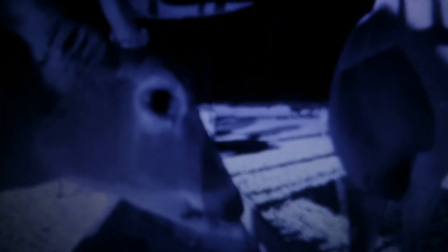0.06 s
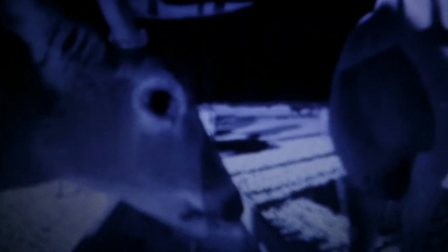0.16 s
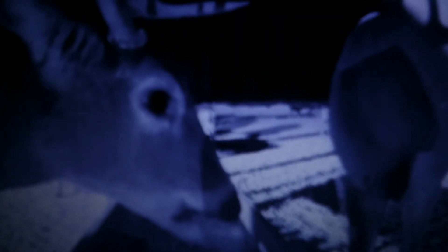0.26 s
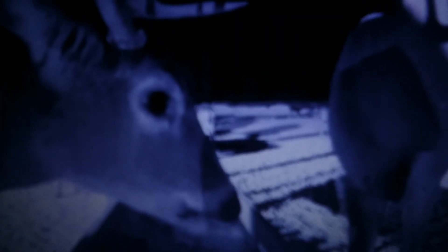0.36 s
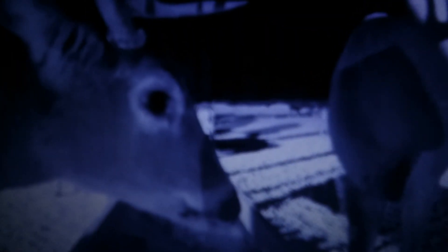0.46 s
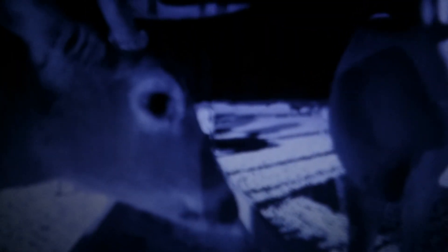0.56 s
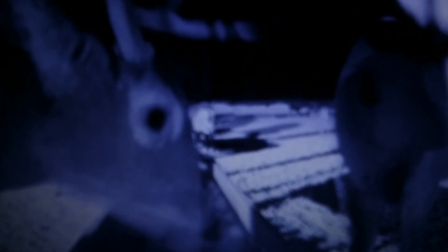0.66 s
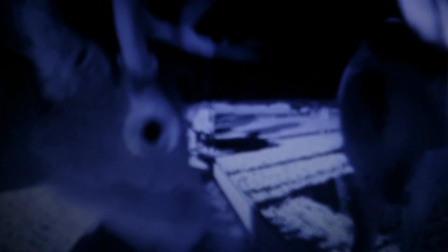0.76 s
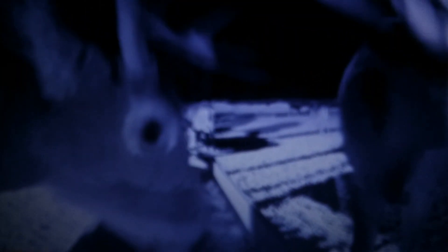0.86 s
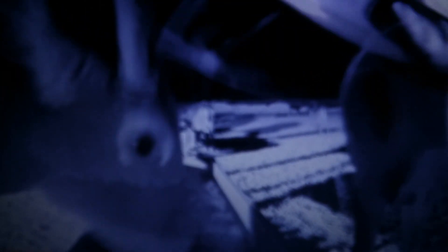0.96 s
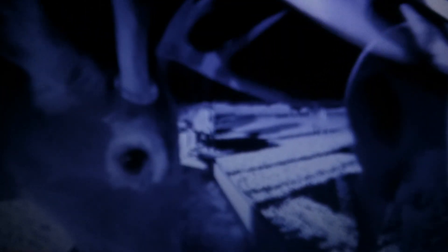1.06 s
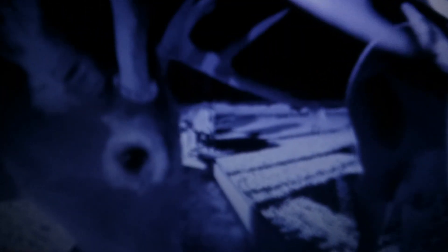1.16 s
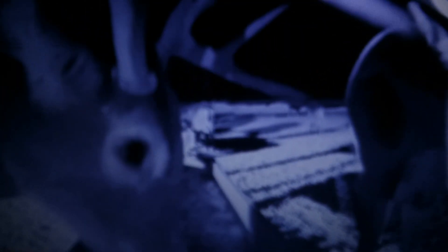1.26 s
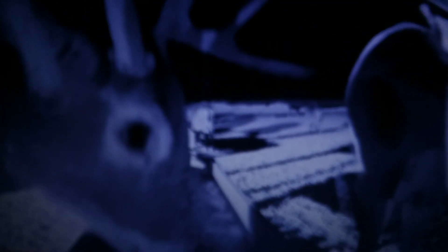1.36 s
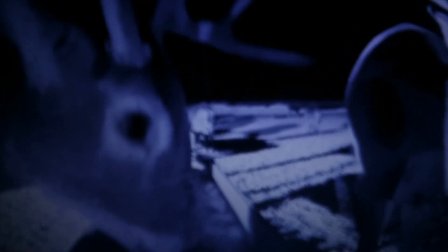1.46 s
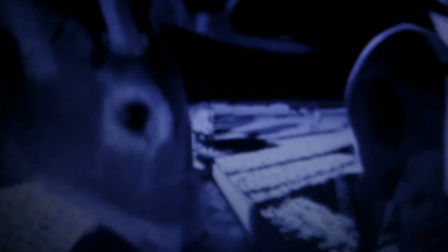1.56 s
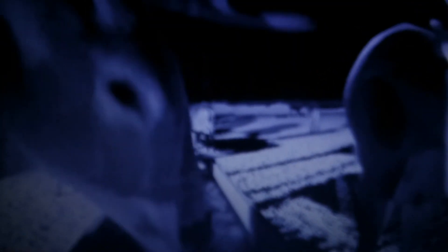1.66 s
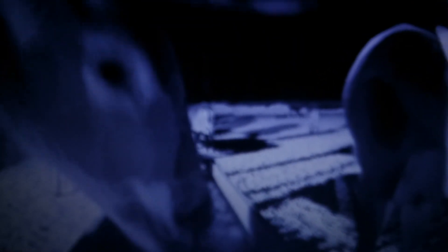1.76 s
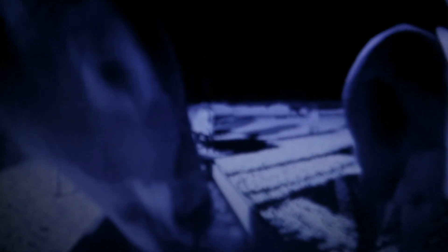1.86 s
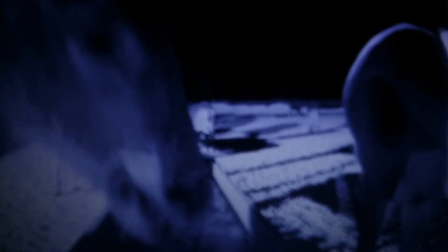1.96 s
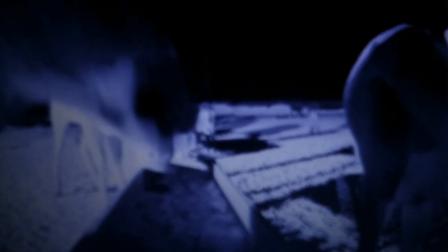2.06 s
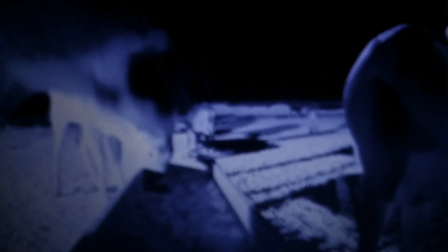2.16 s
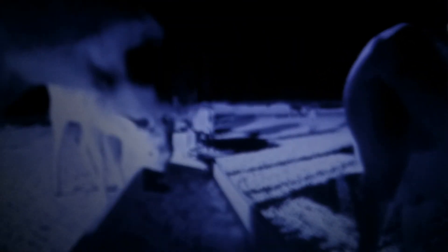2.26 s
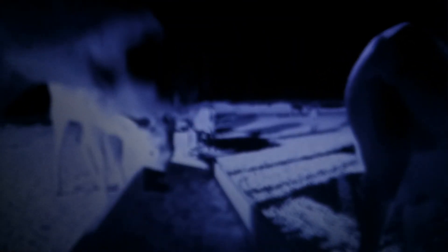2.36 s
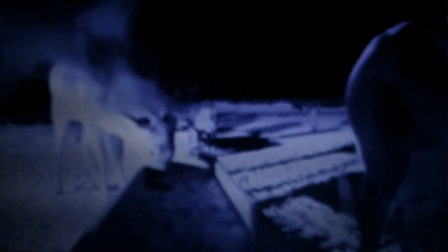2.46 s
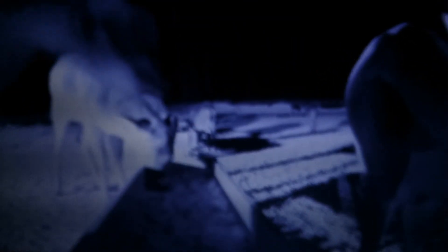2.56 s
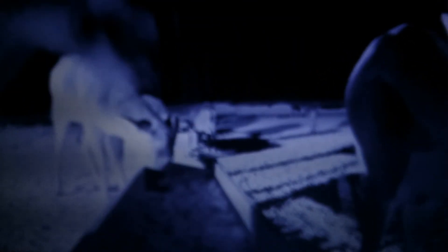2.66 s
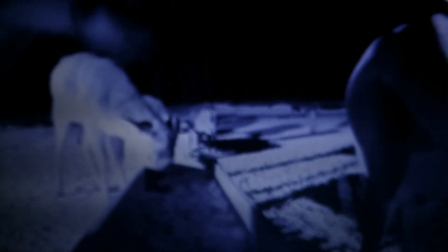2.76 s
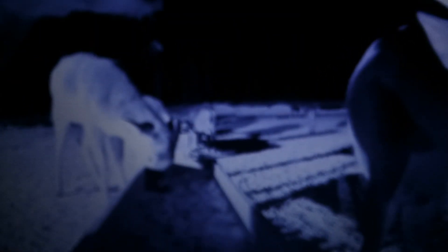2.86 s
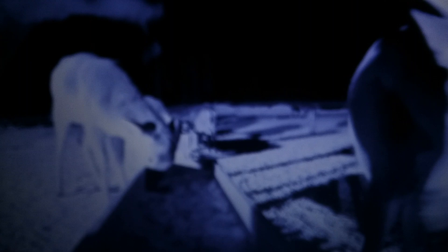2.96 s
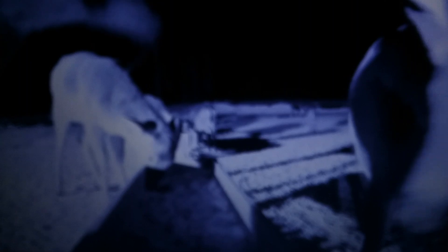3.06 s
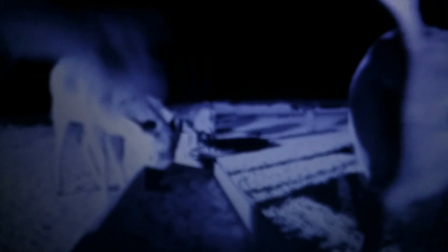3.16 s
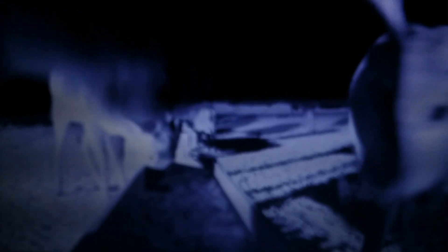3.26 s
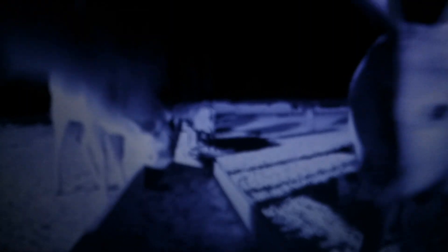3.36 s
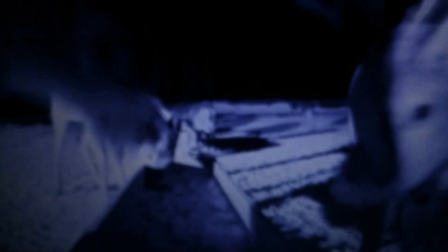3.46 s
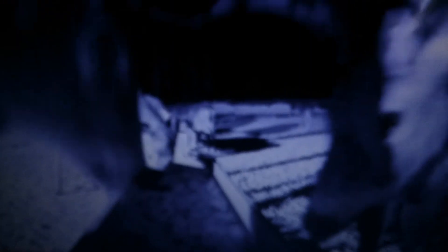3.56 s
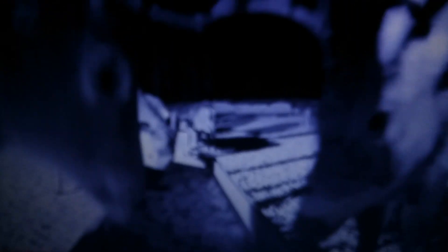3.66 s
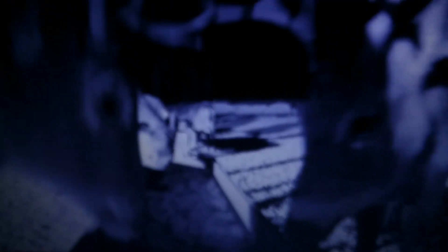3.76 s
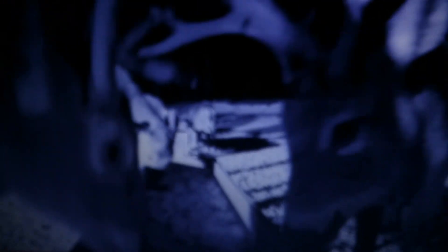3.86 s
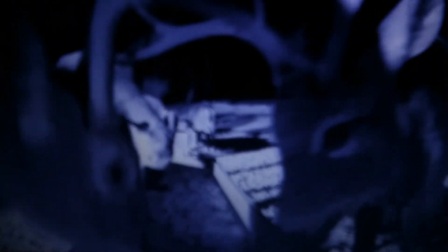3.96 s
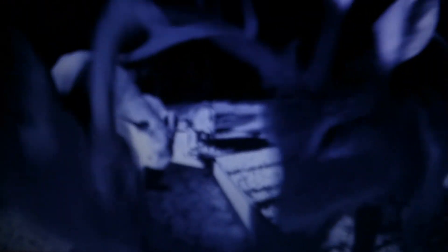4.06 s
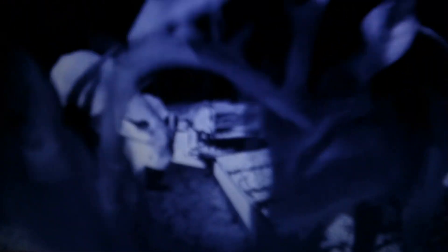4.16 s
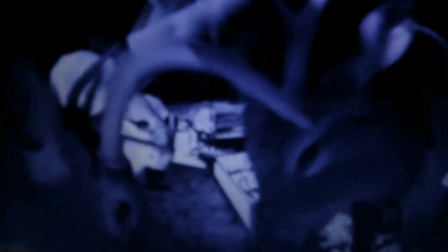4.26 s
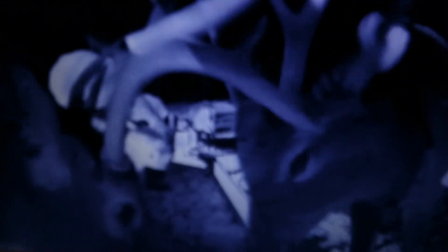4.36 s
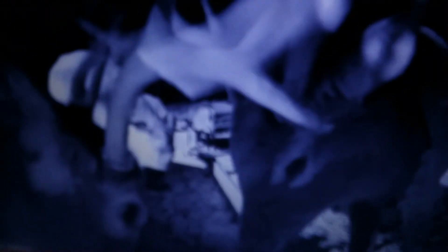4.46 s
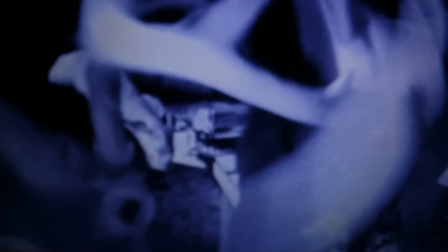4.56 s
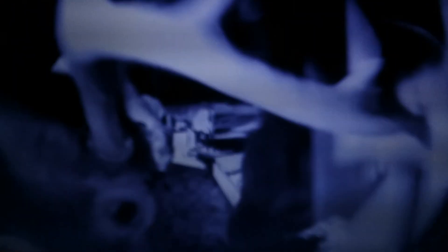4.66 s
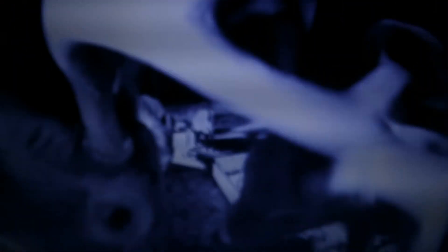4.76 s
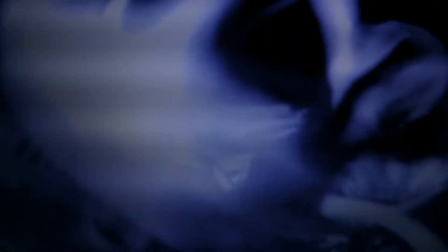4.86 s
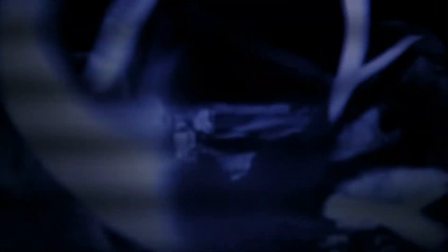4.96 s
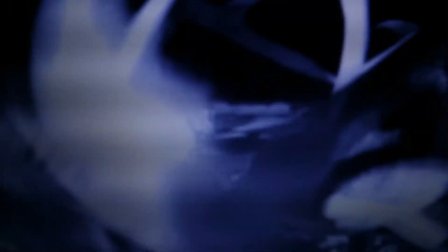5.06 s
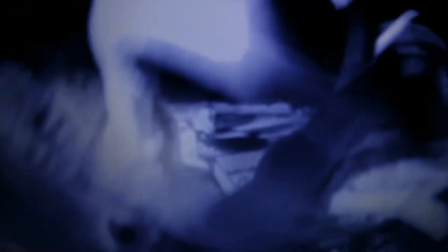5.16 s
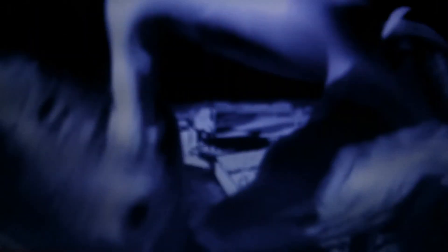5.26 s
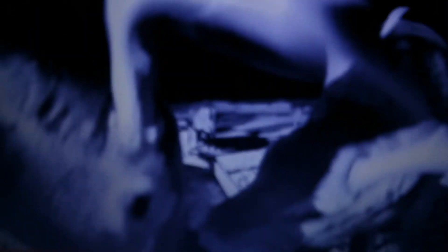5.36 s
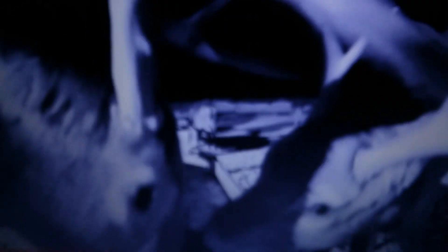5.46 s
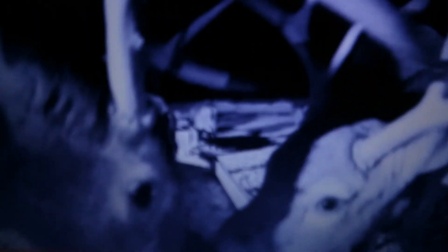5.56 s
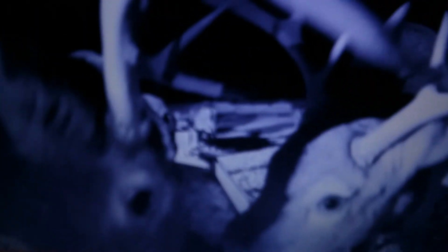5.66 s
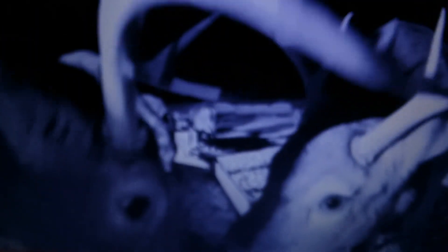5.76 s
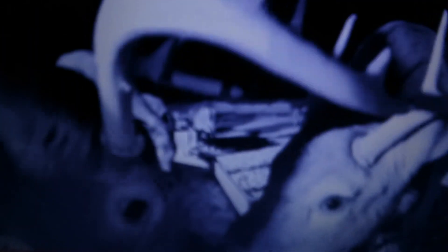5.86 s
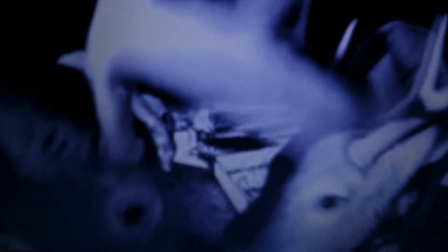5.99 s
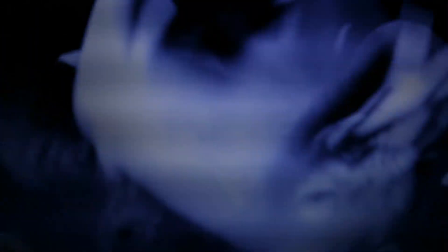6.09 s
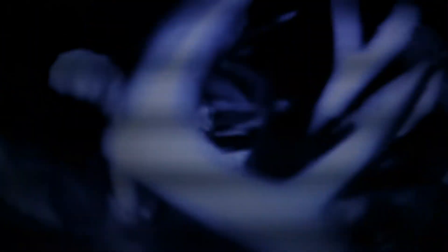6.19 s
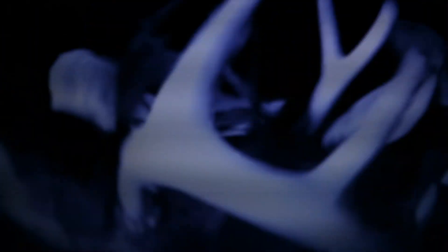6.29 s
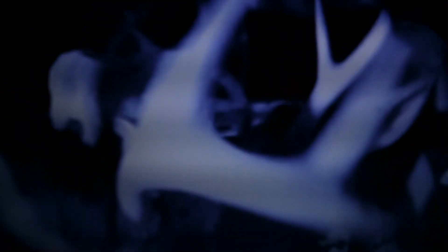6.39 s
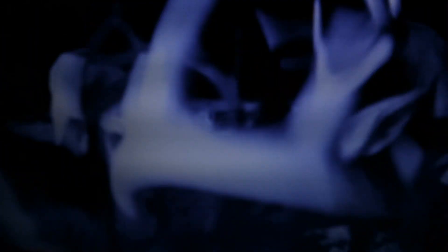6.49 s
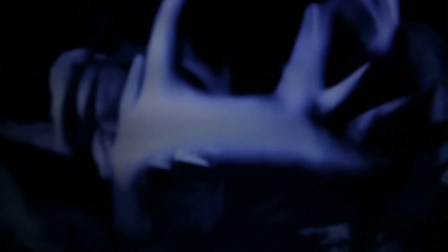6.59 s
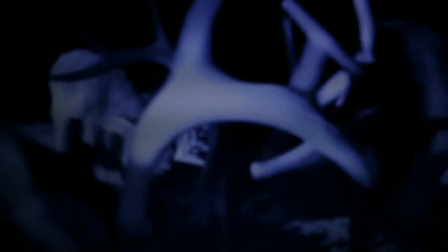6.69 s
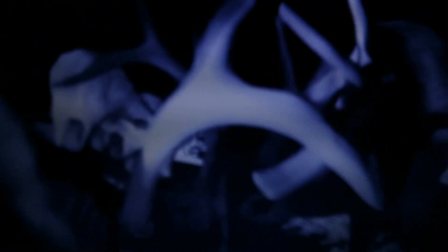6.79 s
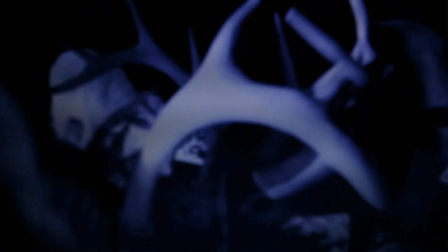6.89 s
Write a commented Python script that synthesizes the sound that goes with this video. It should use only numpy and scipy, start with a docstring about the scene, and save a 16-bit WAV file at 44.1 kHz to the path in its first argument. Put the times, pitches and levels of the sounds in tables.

```python
"""Antlers knock and chatter on a small outdoor camera as deer jostle at a feeder trough: bursts of noise
and decaying rings excite the housing's narrow, tinny resonances; hard blows add a crack and a mount thud.
Coats brush past and antlers scrape along as grainy friction through the same housing, with taps between.
Feed rustles throughout as small random catches; bright swishes and ticks are short, grainy bursts of high hiss.
A faint hum and electronic hiss lie underneath."""
import sys
import numpy as np
from scipy import signal
from scipy.fft import rfft, irfft, next_fast_len
from scipy.io import wavfile
from scipy.ndimage import uniform_filter1d, minimum_filter1d, map_coordinates

SR = 44100
rng = np.random.default_rng(int(sys.argv[2]) if len(sys.argv) > 2 else 0)


def wav_out(sig):
    """Save sig, one row per channel (or a flat mono array), as 16-bit PCM at SR to the path in sys.argv[1]."""
    wavfile.write(sys.argv[1], SR, np.round(np.clip(np.atleast_2d(sig).T, -1, 1) * 32767).astype(np.int16))


N = 305613  # samples

# Antler blows. Each row: start in seconds, strength in dB, middle register in dB against the body,
# brightness (edge register) in dB against the body, hardness 0-1, low ring in Hz, high ring in Hz,
# contact length in seconds.
KNOCKS = [(3.566, -20.5, -16.5, -3, 0.02, 1210, 3310, 0.0023),
          (3.809, -27.5, -9.5, 7, 0.1, 1193, 3392, 0.0043), (3.87, -32, 0.5, 11, 0.6, 1220, 3445, 0.0033),
          (4.081, -22, -26, -9.5, 0.01, 990, 3410, 0.0089), (4.353, -24, -3.5, 4, 0.99, 1193, 3250, 0.012),
          (4.409, -28.5, -0.5, 1, .35, 1228, 3404, 0.0046),
          (4.45, -25.5, -16, -0.5, .1, 1155, 3200, 0.0067),
          (4.566, -20.5, -5.5, -6, .35, 1234, 2883, 0.004), (4.631, -21, -9.5, -17, 0.08, 1224, 3480, .008),
          (4.926, -22, -11.5, -15.5, 0.03, 1220, 2870, 0.03), (4.983, -20.5, -4, 3, .4, 1203, 2910, 0.0068),
          (5.021, -20, -6.5, 6.5, 0.74, 1190, 3414, 0.0088), (5.053, -23, -6, 0.5, .35, 1193, 3430, 0.0038),
          (5.071, -28, -8, -16, 0, 1220, 3570, 0.0054), (5.681, -32, -5.5, -27, 0, 1106, 3440, 0.0086),
          (6.031, -22, -18, -11.5, 0, 1194, 3220, 0.0051),
          (6.168, -21, -14, -14.5, 0.04, 1251, 3290, 0.008),
          (6.328, -15, -8, -15.5, 0.46, 1122, 3000, 0.0059),
          (6.367, -26, -4.5, -22, 0.4, 1166, 2900, 0.0064), (6.402, -23, -10, -14, 0.2, 1169, 2780, 0.006),
          (6.504, -36.5, -18, -1, 0.2, 1190, 3460, 0.0069), (6.56, -24, -17, -6.5, 0, 1213, 2840, 0.0075),
          (6.575, -23.5, -8, -3, 0.03, 1133, 2760, 0.017), (6.63, -23, 0, 2.5, .4, 1301, 3396, 0.0028),
          (6.696, -15, -17.5, -6, 0.74, 1405, 2963, 0.0072), (6.756, -23.5, -19, -14, 0, 1465, 3040, .0046),
          (6.801, -23, -7.5, -9.5, .58, 1405, 2850, 0.0051)]
# Light taps in the trough. Each row: start in seconds, strength in dB, brightness in dB, ring in Hz.
TAPS = [(0.145, -46, -1, 1035), (0.724, -40.5, -21, 950), (.855, -51.5, 8.5, 1220), (1.015, -53.5, 7, 927),
        (1.15, -42.5, 4, 2000), (1.234, -53, 5.5, 1320), (1.482, -47, -17, 2050), (1.6, -37.5, -49, 1040),
        (2.42, -51.5, -20, 1110), (2.457, -49.5, -13, 1210), (2.647, -58, 19.5, 1260),
        (3.098, -41, -11.5, 1770), (3.108, -35.5, -15, 2040), (3.355, -45, -41, 993),
        (4.87, -42.5, -13, 1320), (5.59, -45, -40, 1215)]
# Resonances of the housing. Each row: centre in Hz, width in Hz (6 dB down at its ends), relative level in dB.
HOUSING_MODES = [(951, 99, 2), (1035, 82, 0), (1229, 248, 3), (1405, 157, -1), (1691, 260, -6.5),
                 (1963, 132, -3), (2091, 290, -7), (2170, 284, -11), (2516, 20, -8), (2846, 292, -8),
                 (3097, 240, -9.5), (3428, 197, -5.5), (4115, 49, -19), (4127, 536, -19)]
# Registers of the housing: body, middle, edge. Each row: low edge in Hz, high edge in Hz.
REGISTER_BANDS = [(780, 1550), (1550, 2600), (2600, 4450)]
# Colour of the shaken mount. Each row: frequency in Hz, relative level in dB.
THUD_COLOUR = [(140, -25.5), (200, -9), (330, 2), (420, -6.5), (520, 3.5), (630, -6.5), (780, 2.5),
               (1300, -58)]
# Colour of a hard blow's crack. Each row: frequency in Hz, relative level in dB.
CRACK_COLOUR = [(3000, -33.5), (4400, 13.5), (5200, 12.5), (5700, -1.5), (7300, 8), (9500, -13),
                (12500, -5.5), (16000, -11.5)]
# Stereo balance. Each row: frequency in Hz, left minus right in dB.
BALANCE = [(60, 0.5), (300, -9.5), (700, -3), (1250, -1), (2000, -7), (3100, -9), (4400, -2.5), (8000, 0.5)]
# Stereo likeness. Each row: frequency in Hz, left-right correlation 0-1 before the phase lead.
LIKENESS = [(60, 0.66), (600, 0.72), (1200, 1), (2500, 0.99), (3400, 0.84), (7000, 0.067), (15000, .05)]
# Stereo phase. Each row: frequency in Hz, lead of the left side in radians.
LEFT_LEAD = [(1000, 0.44), (1200, -1.22), (1520, -0.98), (1620, 1.88), (2080, 1.36), (2220, 1.8),
             (2900, 1.44), (3220, -0.58), (3330, 0.22), (3600, -0.96), (3800, -0.29), (4100, -1.6)]
# Colour of the hum and hiss. Each row: frequency in Hz, relative level in dB.
FLOOR_COLOUR = [(25, -34.5), (40, -22), (54, 5.5), (65, -0.5), (100, 3), (160, 4), (210, -6), (330, 1),
                (450, -12), (700, -17), (1500, -23), (4000, -21.5), (6000, -28), (8400, -23.5),
                (10500, -28), (15500, -23)]
# Bright swishes and ticks. Each row: middle in seconds, half length in seconds, level in dB.
SWISHES = [(0.376, .12, -68), (1.18, 0.049, -58.5), (1.851, 0.023, -53), (1.904, .05, -66),
           (3.961, 0.12, -54.5), (4.089, 0.0082, -41), (5.052, .05, -42.5), (5.23, 0.0036, -35.5),
           (5.278, 0.036, -52), (6.035, .028, -49.5), (6.083, 0.0088, -46.5)]
# Colour of the swishes, ticks and friction hiss. Each row: frequency in Hz, relative level in dB.
SWISH_COLOUR = [(2800, -51), (3500, -6.5), (3900, 2), (4250, 1), (4600, -10), (5150, -7.5), (5450, -27.5),
                (9000, -47.5)]
# Coats passing. Each row: middle in seconds, half length in seconds, level in dB, brightness in dB,
# middle register in dB against the body.
BRUSHES = [(0, 0.02, -40, -17, -20), (0.354, 0.033, -50.5, -1, -23), (0.465, 0.038, -43.5, -14, -29),
           (0.607, 0.013, -59, 8, 1), (.73, 0.035, -54, -2.5, -11), (1.147, 0.07, -50, 2, 1),
           (1.305, 0.054, -43, -15.5, -7), (1.593, 0.051, -42, -19, -17), (2.102, 0.033, -48, -6, -11),
           (2.342, 0.06, -53.5, -4, 0.5), (2.69, 0.059, -52, -1, -4.5), (2.896, 0.032, -53, 0, -5),
           (3.097, 0.056, -57, -4, 9.5), (3.243, .035, -49, -15, -10.5), (4.767, 0.052, -52, 8.5, 0),
           (5.268, .04, -41, 2, -0.5), (5.423, 0.044, -36.5, 0.5, -11), (5.712, 0.034, -41, -23, -12)]
# Antlers dragging. Each row: start in seconds, length in seconds, level in dB, brightness in dB,
# swell from start to end in dB.
SCRAPES = [(3.882, 0.19, -34, -9, 16.5), (4.354, 0.072, -41, 3.5, -10), (4.479, 0.054, -31.5, -7.5, 14),
           (4.615, 0.063, -31, -3, -8), (4.897, 0.05, -37.5, -5, 4.5), (4.997, 0.13, -39, -1, -1.5),
           (5.999, 0.038, -35.5, 0, 0), (6.094, 0.058, -38, 7, 15), (6.199, 0.069, -42, 5.5, -13.5),
           (6.321, 0.19, -36.5, -2.5, 13.5), (6.575, 0.068, -43, -10, -4), (6.71, .05, -37, -13, -6),
           (6.821, 0.077, -31, -7, 4.5)]
# Feed loudness. Each row: time in seconds, level in dB before the layer's trim.
RUSTLE_LEVEL = [(0, -43.5), (.11, -61), (.2, -52), (1.0, -52.5), (1.4, -55.5), (1.95, -53), (2.53, -58),
                (2.75, -55.5), (3.3, -55.5), (3.48, -59.5), (3.8, -62), (4.16, -53), (4.3, -54.5),
                (4.8, -45), (5.3, -44), (5.9, -51.5), (6.93, -46)]
# Feed colour. Each row: time in seconds, brightness in dB.
RUSTLE_BRIGHTNESS = [(0, -6.5), (1, -5), (3.7, -7.5), (4.2, -13), (6.93, -10)]

CRACK_DB, SOFT_CRACK_DB = -12, -46.5  # crack of the hardest blow; change at zero hardness
THUD_DB, HARD_THUD_DB = -35, 18  # thud at zero hardness; what full hardness adds
LOW_SPOT_HZ, HIGH_SPOT_HZ = 335, 590  # half widths of the ranges that a struck spot favours
ATTACK_S, RELEASE_S = 0.0051, 0.023  # time constants as a scrape grips and lets go
EDGE_SWELL = 0.43  # share of the swell that reaches the edge: pressing harder darkens a scrape
TOP_HZ = 15950  # upper band limit


def amp(db):
    """Decibels to linear gain."""
    return 10 ** (np.asarray(db) / 20)


def unit(x):
    """x scaled to an rms of one."""
    return x / np.sqrt(np.mean(x ** 2) + 1e-20)


def along(points, hz):
    """Read (Hz, value) points on a log frequency axis."""
    f, v = np.transpose(points)
    return np.interp(np.log(hz + 1), np.log(f + 1), v)


def timeline(points):
    """One value per sample from (seconds, value) points."""
    return np.interp(np.arange(N) / SR, *np.transpose(points))


def wobble(rate):
    """A smooth random curve with rate knots a second."""
    knots = rng.standard_normal(int(N * rate / SR) + 4)
    return map_coordinates(knots, [np.arange(N) * rate / SR])


def filtered(x, response):
    """Shape x by a response given as a function of frequency in Hz."""
    n = x.shape[-1]
    m = next_fast_len(n + 4096)  # padding keeps the tail from wrapping round
    return irfft(rfft(x, m) * response(np.fft.rfftfreq(m, 1 / SR)), m)[..., :n]


def coloured(x, spectrum):
    """Give x a colour of (Hz, dB) points."""
    return filtered(x, lambda hz: amp(along(spectrum, hz)))


def sized(x, db):
    """Scale a short sound so its energy equals that of 20 ms at db rms."""
    energy = np.sum(x.mean(0) ** 2)
    return amp(db) * x / np.sqrt(energy / (SR / 50) + 1e-20)


def add(track, s, sound):
    """Mix a sound in at s seconds."""
    start = max(round(s * SR), 0)
    part = track[:, start:start + sound.shape[1]]
    part += sound[:, :part.shape[1]]


def noise(n):
    """White noise as two microphone ports hear it: partly alike, out of step, mostly leaning right."""
    def mid_side(hz):
        turn = np.arccos(np.clip(along(LIKENESS, hz), -1, 1)) / 2
        return np.array([np.cos(turn), np.sin(turn)])

    def ports(hz):
        balance = amp(np.outer([.5, -.5], along(BALANCE, hz)))
        return balance * np.exp(1j * np.outer([.5, -.5], along(LEFT_LEAD, hz)))

    mid, side = filtered(rng.standard_normal((2, n)), mid_side)
    return filtered(np.array([mid + side, mid - side]), ports)


def registers(size=4096):
    """The housing's causal impulse response, split into body, middle and edge."""
    hz = np.fft.rfftfreq(size, 1 / SR)
    power = sum(amp(db) ** 2 / (1 + ((hz - centre) / width * 2) ** 2) ** 2
                for centre, width, db in HOUSING_MODES)
    # keeping only the causal half of the cepstrum makes the ring minimum phase
    cepstrum = irfft(np.log(power + 1e-12))
    cepstrum[size // 2:] = 0
    ring = irfft(np.exp(rfft(cepstrum) - cepstrum[0]))[:size // 2]
    filters = [signal.butter(5, band, 'bandpass', fs=SR, output='sos') for band in REGISTER_BANDS]
    return [signal.sosfilt(sos, ring) for sos in filters]


def housing(force):
    """The housing's resonances ring under a force, register by register."""
    return [signal.fftconvolve(force, ring[None], axes=1)[:, :force.shape[1]] for ring in registers()]


def register_gains(db, bright_db, middle_db, middle_share):
    """Gains of body, middle and edge: brightness lifts the edge fully and the middle in part."""
    return amp([db, db + middle_db + middle_share * bright_db, db + bright_db])


def shifting(x, depth_db):
    """The moving point of contact lifts and drops narrow bands for a few hundredths of a second."""
    z = signal.stft(x, nperseg=1024)[2]
    field = uniform_filter1d(rng.standard_normal(z.shape[1:]), size=3, axis=0)  # across frequency
    field = uniform_filter1d(field, size=5, axis=1)  # across time
    return signal.istft(z * amp(depth_db * unit(field)), nperseg=1024)[1][:, :N]


def friction(gains, grip, grain_db, shift_db, thud_db, hiss_db):
    """Fine grains under an uneven grip ring the housing; the mount rumbles and the surface hisses along."""
    force = shifting(noise(N), depth_db=shift_db) * grip * amp(grain_db * wobble(900))
    scrape = sum(gain * unit(part) for gain, part in zip(gains, housing(force)))
    thud = gains[0] * amp(thud_db) * unit(coloured(force, THUD_COLOUR))
    hiss = gains[2] * amp(hiss_db) * unit(coloured(force, SWISH_COLOUR))
    return scrape + thud + hiss


def slips(per_s, lift_db, slip_s, strength):
    """A steady drag plus decaying catches at random moments, strength times as strong and up to lift_db more."""
    when, size = rng.random((int(per_s * N / SR), 2)).T
    catches = np.bincount((when * N).astype(int), amp(lift_db * size), N)
    decay = np.exp(-1 / (slip_s * SR))
    return 1 + strength * signal.lfilter([1], [1, -decay], catches)


def contact(t, length, tail_db, tail_t60, rise=0.00086):
    """Force of one blow: dense chatter while the surfaces touch, then a faint dying rattle."""
    touch = np.exp(-(t / length) ** 2)
    rattle = amp(tail_db - 60 * t / tail_t60)  # tail_t60: seconds to fall 60 dB
    return noise(len(t)) * (touch + rattle) * (1 - np.exp(-(t / rise) ** 2))


def ringing(t, hz, t60, rise):
    """One mode builds up during the contact and dies away, with the ports' balance and phase lead."""
    sides = np.array([[.5], [-.5]])
    phase = 2 * np.pi * (hz * t + rng.random()) + sides * along(LEFT_LEAD, hz)
    decay = amp(sides * along(BALANCE, hz) - 60 * t / t60)
    return decay * np.sin(phase) * (1 - np.exp(-(t / rise) ** 2))


def favoured(x, centre_hz, width_hz):
    """The struck spot passes what lies near its own mode; brought to 0 dB."""
    return sized(filtered(x, lambda hz: 1 / (1 + 1j * (hz - centre_hz) / width_hz)), 0)


def brushing(clump_db=2.0):
    """Each passing coat rubs the housing, swelling and fading as its hair clumps unevenly."""
    t = np.arange(N) / SR
    power = 0
    for s, half, db, bright_db, middle_db in BRUSHES:
        register_power = amp([db, db + middle_db, db + bright_db]) ** 2
        power = power + np.outer(register_power, np.exp(-((t - s) / half) ** 2))
    clumps = amp(clump_db * wobble(90))
    return friction(np.sqrt(power), clumps, grain_db=2.5, shift_db=3, thud_db=-26.5, hiss_db=-24.5)


def rustling(level_db=-1.5, middle_db=-0.5, middle_share=0.78, restless_db=2.5):
    """Feed rustles restlessly, with small crackles as pellets shift."""
    level = timeline(RUSTLE_LEVEL) + level_db + restless_db * wobble(14)
    gains = register_gains(level, timeline(RUSTLE_BRIGHTNESS), middle_db, middle_share)
    crackle = slips(per_s=22, lift_db=7, slip_s=0.0027, strength=1.65)
    return friction(gains, crackle, grain_db=1.5, shift_db=2.5, thud_db=-25, hiss_db=-27)


def hum_and_hiss(level_db=-65):
    """Steady coloured noise gives a faint hum and thin electronic hiss."""
    return amp(level_db) * unit(coloured(noise(N), FLOOR_COLOUR))


def taps(ring_db=-1, middle_db=-5, middle_share=0.34):
    """Light contacts in the trough reach the microphone through the same housing."""
    out, t = np.zeros((2, N)), np.arange(SR // 8) / SR
    for s, db, bright_db, ring_hz in TAPS:
        body, middle, edge = housing(contact(t, 0.0032, tail_db=-16, tail_t60=0.18))
        body = sized(body, 0) + sized(ringing(t, ring_hz, t60=0.032, rise=0.0027), ring_db)
        gains = register_gains(db, bright_db, middle_db, middle_share)
        add(out, s, sum(gain * sized(part, 0) for gain, part in zip(gains, (body, middle, edge))))
    return out


def swishes(grain_db=3):
    """Bright swishes and ticks: short, grainy bursts of high hiss."""
    t = np.arange(N) / SR
    swell = sum(amp(db) * np.exp(-((t - s) / half) ** 2) for s, half, db in SWISHES)
    grains = noise(N) * amp(grain_db * wobble(440))
    return swell * unit(coloured(grains, SWISH_COLOUR))


def knocks(low_ring_db=1, high_ring_db=-1):
    """Antlers hit the housing, each spot favouring two modes; hard blows also crack and shake the mount."""
    out, t = np.zeros((2, N)), np.arange(SR // 4) / SR
    for s, db, middle_db, bright_db, hardness, low_hz, high_hz, length in KNOCKS:
        body, middle, edge = housing(contact(t, max(length, .001), tail_db=-16, tail_t60=0.14))
        low_ring = sized(ringing(t, low_hz, t60=0.054, rise=0.0045), low_ring_db)
        high_ring = sized(ringing(t, high_hz, t60=0.017, rise=0.0037), high_ring_db)
        body = favoured(body, low_hz, LOW_SPOT_HZ) + low_ring
        edge = favoured(edge, high_hz, HIGH_SPOT_HZ) + high_ring
        blow = sized(body, 0) + sized(middle, middle_db) + sized(edge, bright_db)

        shake = coloured(contact(t, 0.037, tail_db=-14.5, tail_t60=0.15), THUD_COLOUR)
        thud = sized(shake, THUD_DB + HARD_THUD_DB * hardness ** 4)
        snap = coloured(contact(t, 0.0081, tail_db=-16.0, tail_t60=0.25, rise=0.0025), CRACK_COLOUR)
        crack = sized(snap, CRACK_DB + SOFT_CRACK_DB * (1 - hardness))
        add(out, s, amp(db) * (blow + thud + crack))
    return out


def scraping(middle_db=1.0, middle_share=0.4):
    """An antler grips, presses harder or eases off as it drags, and lets go."""
    gains, t = np.zeros((3, N)), np.arange(SR // 2) / SR
    for s, length, db, bright_db, swell_db in SCRAPES:
        pressure_db = swell_db * (np.minimum(t / length, 1) - .5)
        touch = (1 - np.exp(-t / ATTACK_S)) * np.exp(-np.maximum(t - length, 0) / RELEASE_S)
        pressed_bright_db = bright_db - (1 - EDGE_SWELL) * pressure_db
        add(gains, s, touch * register_gains(db + pressure_db, pressed_bright_db, middle_db, middle_share))
    grip = slips(per_s=90, lift_db=7, slip_s=0.0024, strength=1.5)
    return friction(gains, grip, grain_db=1.5, shift_db=6.0, thud_db=-37, hiss_db=-24)


def scene():
    """All the contacts, rustles and bright swishes, over the electronic floor."""
    return brushing() + rustling() + hum_and_hiss() + taps() + swishes() + knocks() + scraping()


def record(dry, top=0.78):
    """A fast limiter holds the loudest peaks, then everything above the band limit is cut."""
    needed = np.minimum(1, top / (np.abs(dry).max(0) + 1e-9))
    gain = uniform_filter1d(minimum_filter1d(needed, size=131), size=131)  # windows of 3 ms
    return filtered(dry * gain, lambda hz: hz < TOP_HZ)


dry = scene()
out = record(dry)
wav_out(out)
```